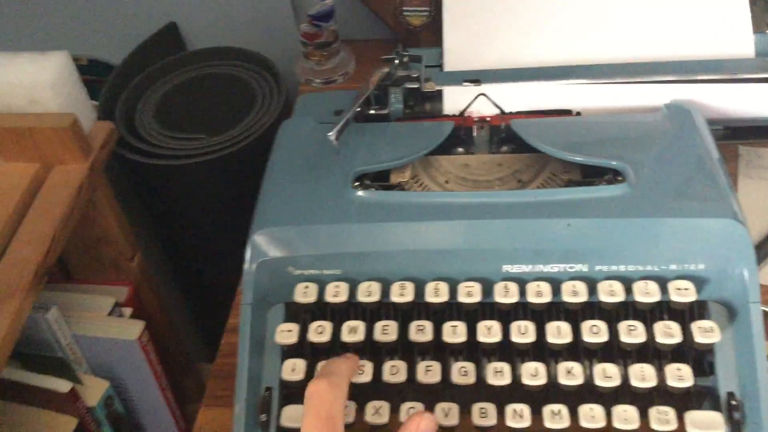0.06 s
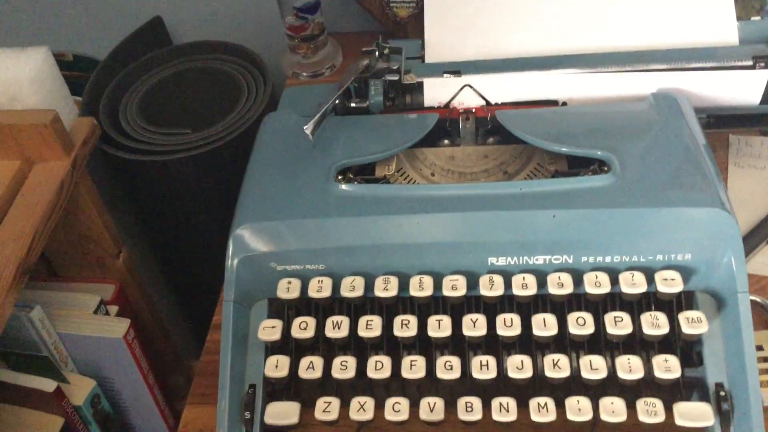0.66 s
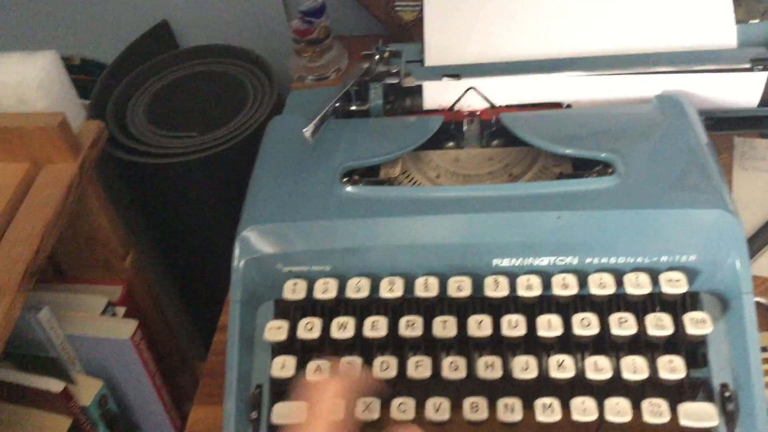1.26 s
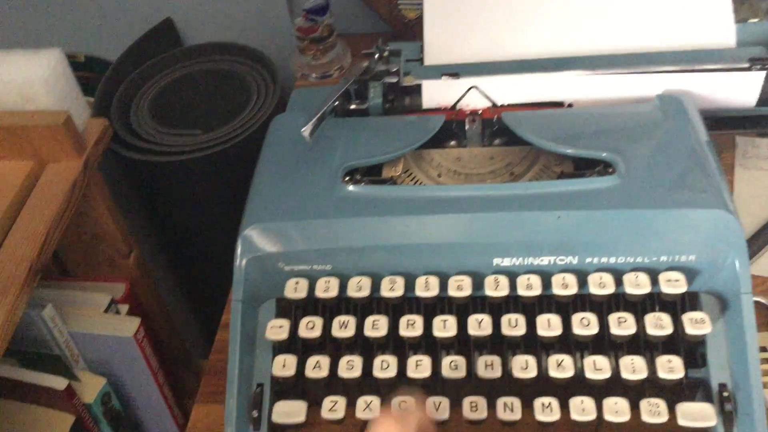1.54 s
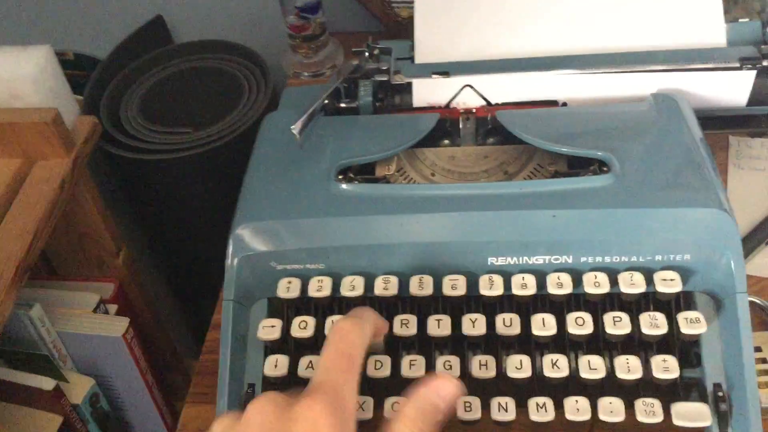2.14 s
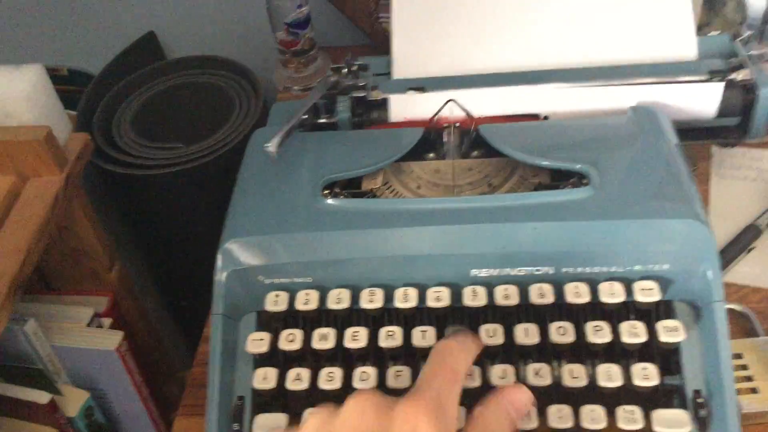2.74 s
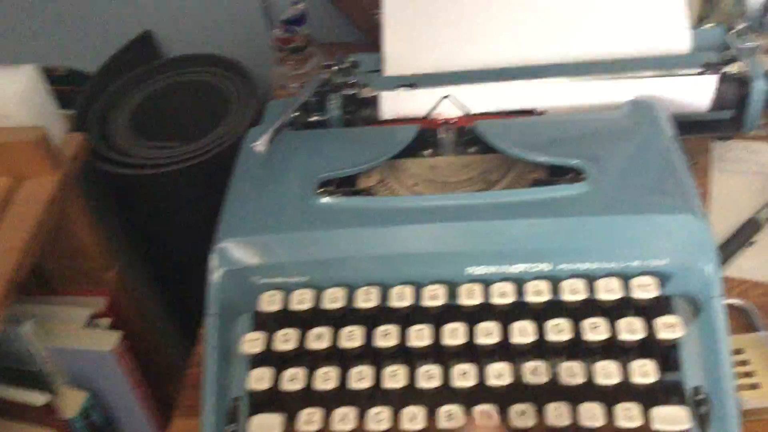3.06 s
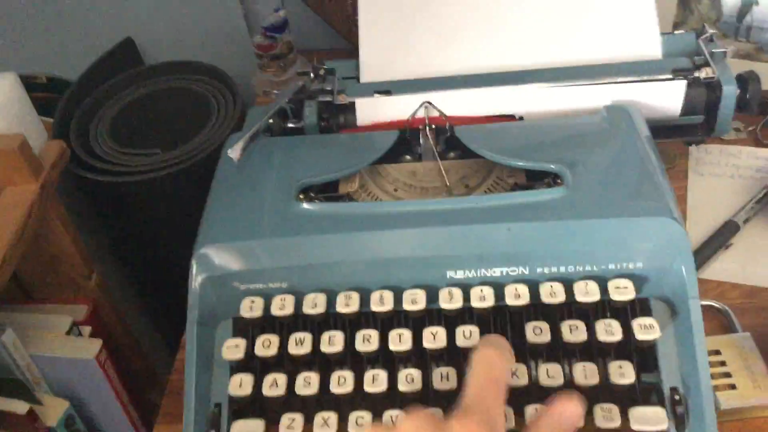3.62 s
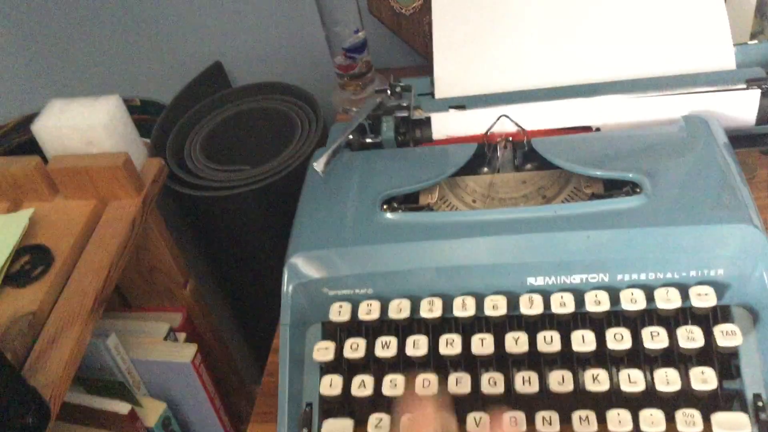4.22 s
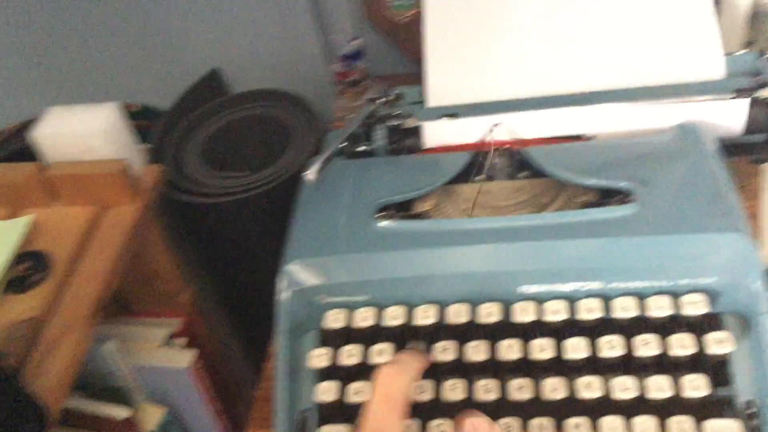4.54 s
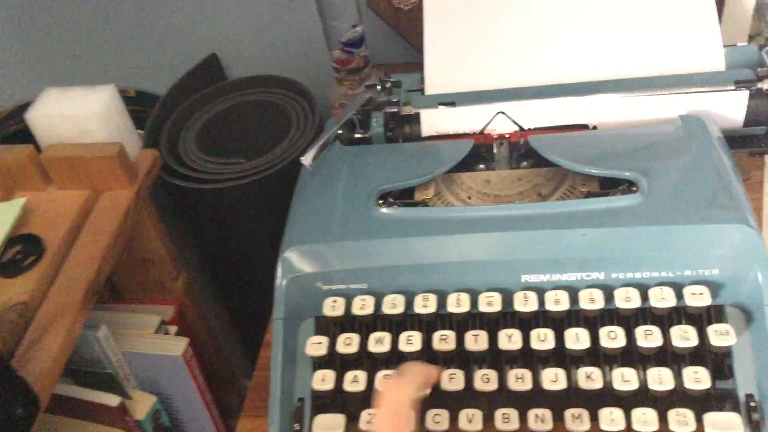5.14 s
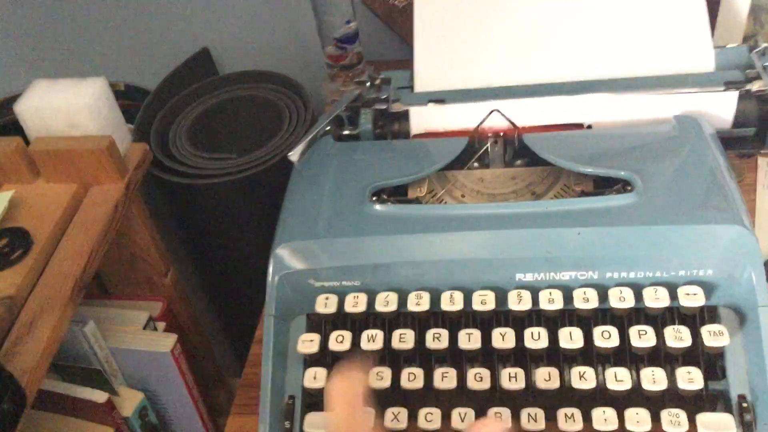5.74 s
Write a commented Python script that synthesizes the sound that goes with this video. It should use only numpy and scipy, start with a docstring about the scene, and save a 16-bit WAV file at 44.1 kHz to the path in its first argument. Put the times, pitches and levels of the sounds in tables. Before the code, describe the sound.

Single typewriter keys clack at an irregular pace, each followed by a brief rattle, with a few duller space bar knocks between.

```python
"""A portable manual typewriter on a wooden desk, typed with one finger, close up in a quiet room.
A fingertip brushes a key and its wire link tinkles. Then a letter: the key takes up its levers, the
typebar slaps the platen, bar and carriage rattle to rest. The space bar knocks down and up.
Twelve letters and four spaces in six seconds, light touches between them; strikes and knocks
ring the metal and thump the desk."""
import sys
import numpy as np
from scipy import signal
from scipy.fft import rfft, irfft
from scipy.io import wavfile

SR = 44100
rng = np.random.default_rng(int(sys.argv[2]) if len(sys.argv) > 2 else 0)


def transcribe(signal):
    """Save signal, clipped to [-1, 1], as a 16-bit WAV file at the path in sys.argv[1]."""
    frames = np.atleast_2d(signal).T
    limited = np.clip(frames, -1, 1)
    pcm = np.round(limited * 32767).astype(np.int16)
    wavfile.write(sys.argv[1], SR, pcm)


N = 263718
AGE_S = np.arange(26460) / SR  # time base of one blow

# brushed keys: (time [s], click [dB], brightness [dB], link tinkle [dB])
KEY_TOUCHES = [(.015, -59, 16, -65), (.056, -57.5, 2, -66), (0.163, -78.5, 5.5, -69),
               (.185, -68.5, 0, -66.5), (0.683, -63, -18, -71), (0.969, -72.5, -2.5, -73.5),
               (.994, -68, -4, -64), (1.085, -61, -1, -67), (1.492, -52, 0, -72), (2.111, -52.5, 1.5, -74),
               (3.968, -74, -10.5, -86), (4.118, -70, 0.5, -78.5), (5.138, -61.5, 7, -81),
               (5.219, -69.5, -2, -85), (5.575, -67.5, -1.5, -79)]
# letters: (strike time [s], key travel before [s], bar fall after [s], finger [dB], force [dB],
# hollowness [dB], sharpness [dB], push through case [dB], rattle [dB], spring pitch [Hz], spring [dB])
KEYSTROKES = [(0.299, 0.055, .11, -50, -29, -7.5, 1.5, -34.5, -35, 9300, -66),
              (1.2213, 0.047, 0.11, -44, -27, -8, 1, -43, -35, 9200, -48),
              (1.842, .058, .112, -53.5, -29, -6, 3.5, -41.5, -35.5, 9500, -66),
              (2.272, 0.036, 0.091, -66, -26.5, -3.5, 1, -41.5, -36, 9750, -64),
              (2.4727, 0.036, .104, -44, -25, -3.5, 3.5, -39, -40, 9700, -48),
              (2.7573, 0.036, 0.1, -42, -25.5, -3.5, 4, -35, -35, 9300, -43.5),
              (3.3553, 0.049, .121, -47, -28.5, -4.5, 1, -39, -32.5, 9200, -60.5),
              (3.678, 0.041, 0.11, -45.5, -24.5, -2, 0.5, -41, -38, 8950, -53),
              (4.228, .047, .119, -53.5, -26.5, 0, 0.5, -43.5, -37.5, 9000, -57.5),
              (4.5436, 0.061, 0.12, -48, -26, .5, 1, -39.5, -36, 9700, -48.5),
              (5.294, 0.039, 0.12, -71, -26, 0, 2.5, -42.5, -36, 10070, -46),
              (5.7382, .035, 0.12, -55, -26, 0, 0.5, -44.5, -35.5, 9700, -53)]
# spaces: (time [s], hold [s], linkage slide [dB], knock down [dB], knock up [dB])
SPACE_STROKES = [(0.7148, 0.085, -60.5, -42.5, -36), (1.515, .08, -55, -40, -36),
                 (3.037, 0.083, -42, -36, -37.5), (4.8386, 0.097, -48, -33.5, -35.5)]

# ringing modes: (frequency [Hz], level [dB], t60 [s])
CASE_MODES = [(700, -7, .11), (865, -8, .1), (1062, -4, .12), (1217, -3, .1), (1520, -4, .07),
              (1900, -1, .07), (2512, -5, .06), (2760, -5, .06), (3160, -5, .06), (3420, -3, .06),
              (4331, -3, .06), (8330, -2, .05), (9157, -3, .05)]  # frame and case
LINK_MODES = [(1540, -6.5, 0.25), (2010, -1, .06), (2200, 1.5, 0.051), (2445, -2, 0.11), (2800, -4, .07),
              (2955, -1.5, 0.1)]  # wire link
DESK_MODES = [(66, -2.5, 0.57), (80, -6.5, .35), (95, 1.5, 0.5), (116, -5, 0.23), (142, -4, .3),
              (202.5, -5, 0.28), (246, -7, 0.21), (324.8, -1, .24), (345.9, -6.5, 0.3)]
SPACE_BAR_MODES = [(452, -3, .1), (530, -7, .05), (603, 1, .08), (689, 2, .08), (861, -1, .07),
                   (1066, -4, .07), (1217, -2, .07), (1500, -4, .05)]
# modes during contact: (frequency [Hz], level [dB])
PLATEN_MODES = [(1728, 3.5), (1150, -23.5)]  # rubber roller
TYPEBAR_MODES = [(2650, 3.5), (3430, 0.5), (4250, -1), (4950, 1.5)]
# noise spectra: (frequency [Hz], density [dB])
METAL_SPECTRUM = [(100, -20), (450, -26), (800, -8), (1150, 2), (2000, 3), (3300, 0), (5000, -1.5),
                  (7000, -4), (9000, -3), (12000, -4), (16000, -9)]  # steel parts
THUMP_SPECTRUM = [(25, -36), (50, -9), (88, 3.5), (140, 0), (200, -22), (320, -8.5), (450, -20), (900, -27),
                  (3000, -78)]  # desk
RATTLE_SPECTRUM = [(100, 4.5), (320, 1), (480, -4), (750, 0), (1150, 6), (2000, -5.5), (4000, -9.5),
                   (7000, -11.5), (9500, -12.5), (12000, -11.5), (16000, -10)]  # loose bars and levers
CRACK_SPECTRUM = [(500, -37.5), (1500, -11), (4000, 2), (6500, -5), (8500, 2), (10500, -6.5), (13000, -6.5),
                  (16000, -32.5)]  # type on platen
PUSH_SPECTRUM = [(50, -11), (100, -7), (240, 0), (330, 2.5), (430, -6.5), (700, -1), (1100, 0),
                 (3000, -34.5)]  # strike through the case
HOLLOW_SPECTRUM = [(100, -11), (280, 3), (400, -8.5), (620, -2.5), (1200, 0), (1900, -11.5), (3500, -17.5),
                   (9000, -29.5)]  # body of the space bar's knock
HUSH_SPECTRUM = [(20, -13), (45, 0), (75, -4.5), (130, -5), (250, -13.5), (500, -23.5), (1100, -26.5),
                 (2000, -29.5), (4000, -36.5), (10000, -38), (16000, -42.5)]  # quiet room
# room decay: (frequency [Hz], t60 [s])
ROOM_DECAY = [(80, 0.62), (300, 0.36), (1000, 0.29), (4000, 0.22), (9000, .25), (16000, 0.17)]

SWARM_LEAD_S, SWARM_WIDTH_S = .08, .027  # rattle: start to peak, spread about the peak


def amp(db):
    """Decibels to gain."""
    return 10 ** (np.asarray(db) / 20)


def curve_at(points, hz):
    """Linear interpolation on a log-frequency axis."""
    point_hz, value = np.transpose(points)
    return np.interp(np.log(hz + 1), np.log(point_hz), value)


def unit(x):
    """Scales a blow to the energy of 10 ms at full level."""
    return x * np.sqrt(.01 * SR / (np.sum(x ** 2) + 1e-20))


def add(mix, at_s, sound):
    """Mixes a sound in at a given time."""
    part = mix[max(round(at_s * SR), 0):][:len(sound)]
    part += sound[:len(part)]


def noise(spectrum, bright_db=0, size=len(AGE_S)):
    """Shaped noise of rms 1; bright_db tilts 9 kHz against 1.5 kHz."""
    hz = np.fft.rfftfreq(size, 1 / SR)
    tilt = curve_at([(1500, -.5), (9000, .5)], hz)
    gain = amp(curve_at(spectrum, hz) + bright_db * tilt)
    x = irfft(rfft(rng.standard_normal(size)) * gain, size)
    return x / np.std(x)


def envelope(t60_s, rise_s):
    """Quick swell, exponential decay."""
    return np.exp(-np.log(1000) * AGE_S / t60_s) * (1 - np.exp(-AGE_S / rise_s))


def burst(spectrum, t60_s, rise_s, bright_db=0):
    """Countless close modes, dying together."""
    return unit(noise(spectrum, bright_db) * envelope(t60_s, rise_s))


def ring(modes, rise_s):
    """Distinct modes; each blow meets the loose parts differently, shifting pitch and level."""
    phases = rng.random(len(modes))
    shares, shifts = rng.standard_normal((2, len(modes)))
    out = np.zeros(len(AGE_S))
    for (hz, db, t60_s), phase, share, shift in zip(modes, phases, shares, shifts):
        tone = np.sin(2 * np.pi * (hz * (1 + .012 * shift) * AGE_S + phase))
        out += amp(db + 2 * share) * tone * envelope(t60_s, rise_s)
    return unit(out)


def click(bright_db=0, rise_s=.001):
    """A small steel part catches or lets go, ringing the case a little."""
    steel = burst(METAL_SPECTRUM, t60_s=.052, rise_s=rise_s, bright_db=bright_db)
    return steel + amp(-6.5) * ring(CASE_MODES, rise_s=.0005)


def key_touches():
    """A brushed key clicks in its slot; its wire link tinkles."""
    out = np.zeros(N)
    for at_s, click_db, bright_db, tinkle_db in KEY_TOUCHES:
        link = ring(LINK_MODES, rise_s=.002)
        steel = burst(METAL_SPECTRUM, t60_s=.07, rise_s=.003, bright_db=-4)
        add(out, at_s, amp(click_db) * click(bright_db, rise_s=.002))
        add(out, at_s, amp(tinkle_db) * unit(link + amp(-6) * steel))
    return out


def desk_thump():
    """The feet pass a blow to the desk, which booms on."""
    return unit(ring(DESK_MODES, rise_s=.005) + amp(-2) * burst(THUMP_SPECTRUM, t60_s=.2, rise_s=.004))


def key_presses(usual_finger_db=-47):
    """The key takes up its slack; levers and ribbon lift slide until the bar is on its way back."""
    out = np.zeros(N)
    for strike_s, travel_s, _, finger_db, *_ in KEYSTROKES:
        onset = envelope(t60_s=.064, rise_s=.0033) * np.clip(AGE_S / .0081, 0, 1)
        take_up = unit(noise(METAL_SPECTRUM, bright_db=2) * onset)
        moving = np.interp(AGE_S, [0, .008, travel_s + .12, travel_s + .18], [0, .8, .7, 0])
        catching = amp(2.5 * noise([(50, 0), (200, -6), (600, -50)]))
        slide_db = -49.5 + .26 * (finger_db - usual_finger_db)  # firmer finger, louder slide
        slide = amp(slide_db) * moving * catching * noise(RATTLE_SPECTRUM, bright_db=1.5)
        add(out, strike_s - travel_s, amp(finger_db) * (take_up + amp(-4) * desk_thump()) + slide)
    return out


def slap(modes, rise_s, contact_s):
    """Modes swell as the type presses into the rubber and die as it springs off."""
    detunes = 1 + .015 * rng.standard_normal(len(modes))
    pressed = (1 - np.exp(-AGE_S / rise_s)) * np.exp(-(AGE_S / contact_s) ** 2)
    tones = sum(amp(db) * np.cos(2 * np.pi * hz * detune * AGE_S)
                for (hz, db), detune in zip(modes, detunes))
    return unit(pressed * tones)


def typebar_strikes(swing_samples=1500):
    """The typebar grazes its guide, slaps the platen, shakes the frame; sharp hits trade clack for crack."""
    out = np.zeros(N)
    for strike_s, _, _, _, force_db, hollow_db, sharp_db, push_db, *_ in KEYSTROKES:
        # reversed: grows as the bar wedges into the guide
        graze = burst(METAL_SPECTRUM, t60_s=.022, rise_s=.0004)[:swing_samples][::-1]
        add(out, strike_s - swing_samples / SR, amp(force_db + sharp_db - 15.5) * graze)
        thock = slap(PLATEN_MODES, rise_s=.0012, contact_s=.002)
        clack = slap(TYPEBAR_MODES, rise_s=.0004, contact_s=.0022)
        add(out, strike_s, amp(force_db + hollow_db) * thock + amp(force_db - sharp_db) * clack)
        crack = burst(CRACK_SPECTRUM, t60_s=.031, rise_s=.000084)
        snap = burst(CRACK_SPECTRUM, t60_s=.0034, rise_s=.0001)
        add(out, strike_s, amp(force_db + sharp_db) * unit(crack + amp(-3) * snap))
        frame = burst(METAL_SPECTRUM, t60_s=.065, rise_s=.0014)
        case = ring(CASE_MODES, rise_s=.0024)
        add(out, strike_s, amp(force_db - 1) * frame + amp(force_db - 8.5) * case)
        push = burst(PUSH_SPECTRUM, t60_s=.12, rise_s=.00087)
        add(out, strike_s, amp(push_db) * (push + desk_thump()))
    return out


def bar_swarm(peak_impacts_per_s=180, spread_db=4):
    """Loose bars knock on their rest: uneven impacts that swell and fade within about 0.1 s."""
    tap = burst(RATTLE_SPECTRUM, t60_s=.043, rise_s=.00016, bright_db=-1.5)
    tap += amp(-8) * ring(CASE_MODES, rise_s=.0009)
    swell = np.exp(-((AGE_S - SWARM_LEAD_S) / SWARM_WIDTH_S) ** 2)
    sizes = amp(spread_db * np.clip(rng.standard_normal(len(AGE_S)), -2, 2))
    hits = rng.random(len(AGE_S)) < peak_impacts_per_s / SR
    return signal.fftconvolve(hits * sizes * swell, tap)[:len(AGE_S)]


def typebar_falls():
    """The carriage steps; the bar lands among jostling neighbours and hops once; its spring shimmers."""
    out = np.zeros(N)
    for strike_s, _, fall_s, *_, rattle_db, spring_hz, spring_db in KEYSTROKES:
        landing_s = strike_s + fall_s
        peak_s = landing_s + .012  # height of the rattle
        add(out, strike_s + .69 * fall_s, amp(-48) * click())  # escapement lets go
        add(out, strike_s + .8 * fall_s, amp(-47.5) * click(bright_db=-6))  # carriage is caught
        add(out, landing_s, amp(rattle_db - 6) * click(bright_db=3, rise_s=.0006))
        rattle = unit(sum(bar_swarm() for _ in range(4)))
        add(out, peak_s - SWARM_LEAD_S, amp(rattle_db) * rattle)
        add(out, peak_s - .008, amp(-39) * desk_thump())
        coil = [(spring_hz - 1200, -26), (spring_hz - 300, -8), (spring_hz, 0),
                (spring_hz + 300, -8), (spring_hz + 1200, -26)]
        add(out, peak_s - .018, amp(spring_db) * burst(coil, t60_s=.17, rise_s=.012))
        add(out, landing_s + .69 * fall_s, amp(rattle_db - 21) * click(bright_db=4.5))  # hop
    return out


def space_bar(usual_knock_db=-34.5, release_slide_db=-50):
    """Down, then up: the linkage slides, the long bar knocks on its stop, the steel behind chatters."""
    out = np.zeros(N)
    sliding = np.interp(AGE_S, [0, .008, .02, .035], [.33, .97, .82, 0])
    for down_s, hold_s, press_slide_db, down_db, up_db in SPACE_STROKES:
        up_s = down_s + hold_s
        moves = (down_s, press_slide_db, down_db), (up_s, release_slide_db, up_db)
        for at_s, slide_db, knock_db in moves:
            add(out, at_s - .016, amp(slide_db) * sliding * noise(METAL_SPECTRUM))
            hollow = burst(HOLLOW_SPECTRUM, t60_s=.091, rise_s=.002)
            knock = unit(ring(SPACE_BAR_MODES, rise_s=.003) + amp(-1) * hollow)
            chatter = burst(METAL_SPECTRUM, t60_s=.088, rise_s=.005, bright_db=-4)
            chatter_db = -40.5 + .06 * (knock_db - usual_knock_db)
            add(out, at_s, amp(knock_db) * knock + amp(chatter_db) * chatter + amp(-38.5) * desk_thump())
        add(out, down_s, amp(-44.5) * click(rise_s=.0003))  # escapement trips
        add(out, up_s - .004, amp(-47) * click(bright_db=-1.5))  # bar grazes its upper stop, then seats
    return out


def room(x, reflections_per_s=4000):
    """Dense reflections of a small furnished room; the treble dies first."""
    taps = rng.standard_normal(len(AGE_S)) * (rng.random(len(AGE_S)) < reflections_per_s / SR)
    taps *= np.clip((AGE_S - .003) / .0026, 0, 1)
    hz, time_s, spectra = signal.stft(taps, SR, nperseg=256)
    decay = np.exp(-np.log(1000) * time_s / curve_at(ROOM_DECAY, hz)[:, None])
    _, tail = signal.istft(spectra * decay, SR, nperseg=256)
    return signal.fftconvolve(x, tail / np.linalg.norm(tail))[:N]


def scene():
    """Machine, reflections and room hush; mono."""
    machine = key_touches() + key_presses() + typebar_strikes() + typebar_falls() + space_bar()
    return (machine + amp(-13.5) * room(machine) + amp(-73) * noise(HUSH_SPECTRUM, size=N))[None]


def record(dry, low_hz=45, high_hz=15600):
    """Microphone bass roll-off, then the band limit."""
    thin = signal.sosfilt(signal.butter(2, low_hz, "highpass", fs=SR, output="sos"), dry)
    lowpass = signal.firwin(255, high_hz, window=("kaiser", 8), fs=SR)
    return signal.oaconvolve(thin, lowpass[None], "same")


dry = scene()
out = record(dry)
transcribe(out)
```